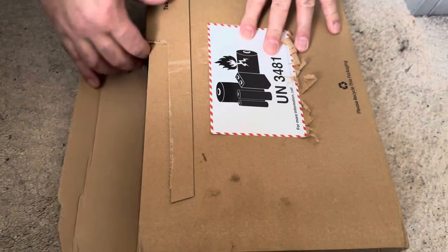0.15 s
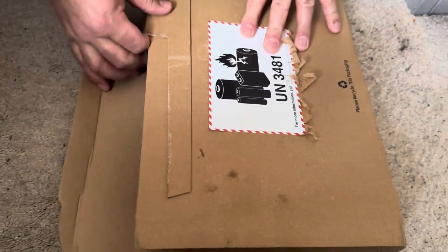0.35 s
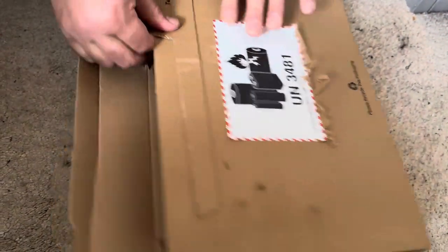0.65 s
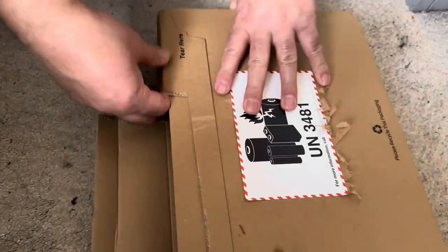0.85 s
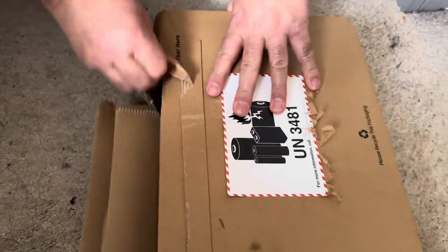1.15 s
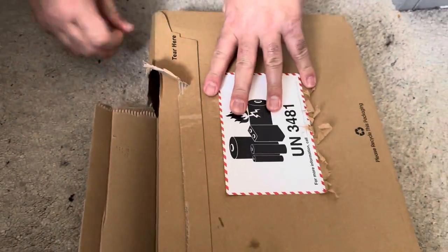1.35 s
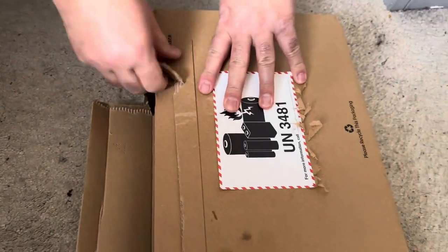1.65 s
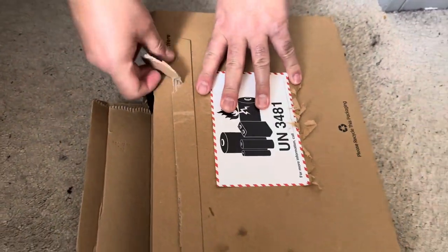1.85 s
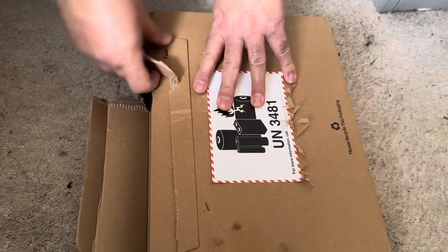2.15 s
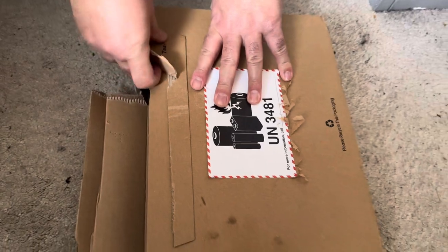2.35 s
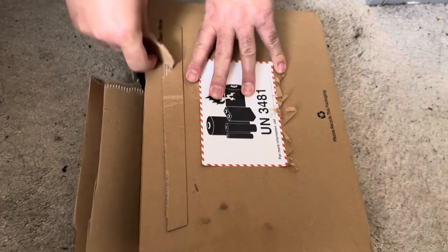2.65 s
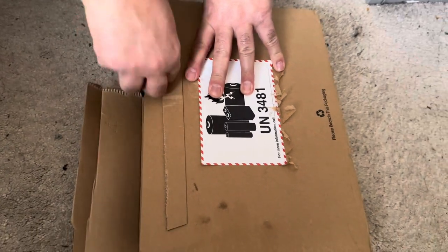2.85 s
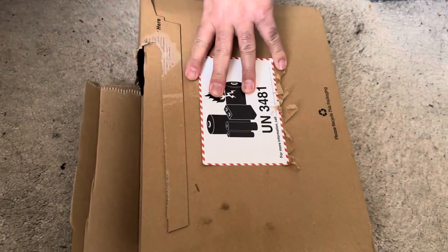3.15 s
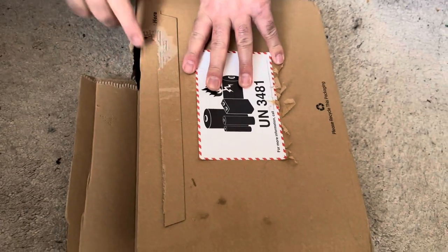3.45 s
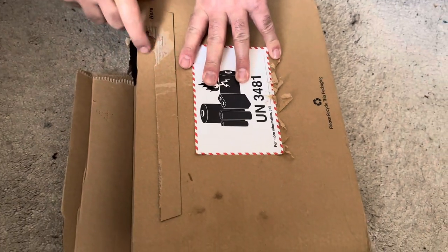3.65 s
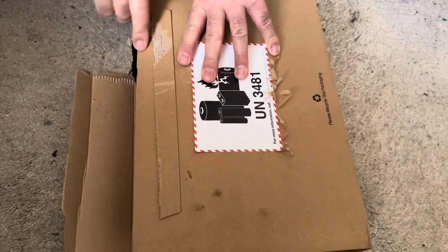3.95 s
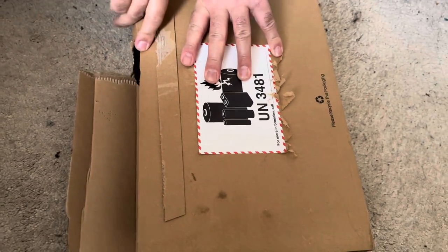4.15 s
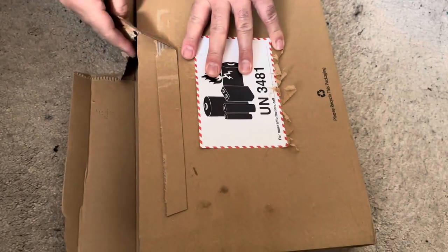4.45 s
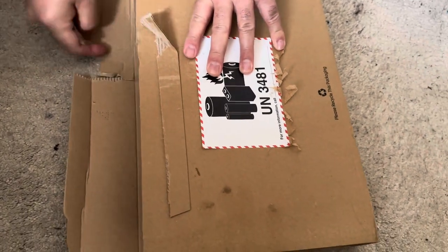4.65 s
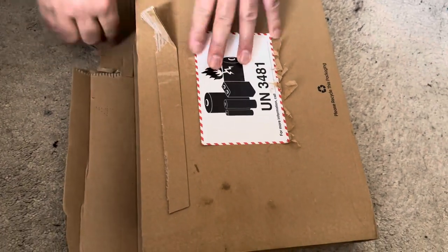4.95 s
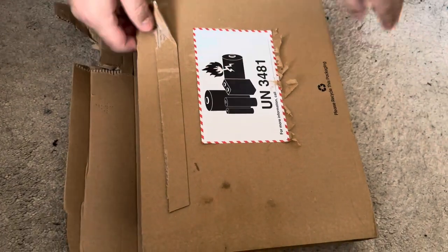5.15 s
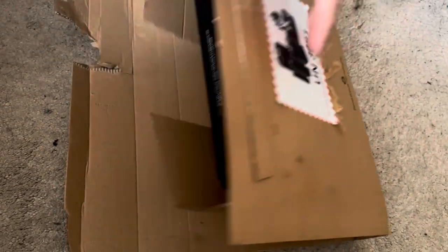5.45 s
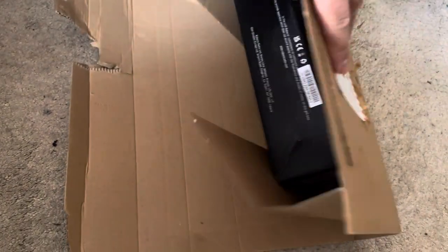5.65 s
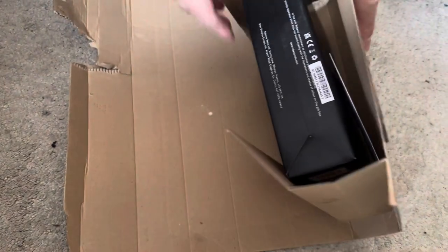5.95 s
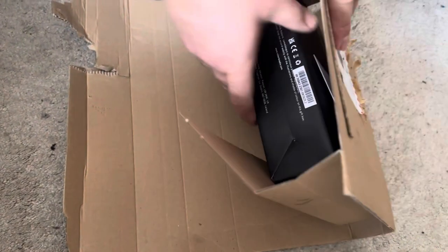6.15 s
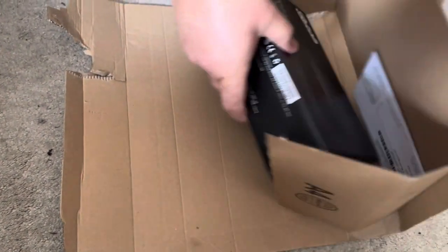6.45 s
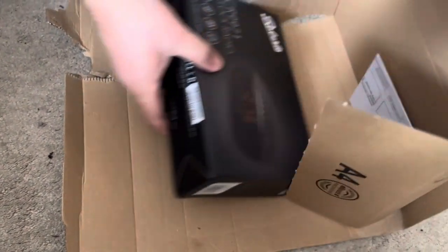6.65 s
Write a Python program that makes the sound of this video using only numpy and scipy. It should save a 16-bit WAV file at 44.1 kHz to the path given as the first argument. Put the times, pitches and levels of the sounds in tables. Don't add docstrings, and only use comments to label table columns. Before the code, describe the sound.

Hands tear open a corrugated cardboard box, very close in a small soft room. A rapid ripping burst comes first, then scattered snaps and another rip. Quiet rustling follows, a hard rip near three seconds, a lull, then faint prying with sharp cracks. The lid folds back with low knocks, and a stiff carton rasps over the cut edge in quick bumps to the end.

```python
import sys
import numpy as np
from scipy import signal
from scipy.fft import rfft, irfft, next_fast_len
from scipy.io import wavfile
from scipy.ndimage import uniform_filter1d, map_coordinates

SR = 44100
rng = np.random.default_rng(int(sys.argv[2]) if len(sys.argv) > 2 else 0)


def convert_level_to_amplitude(level_db):
    exponent = np.asarray(level_db, float) / 20
    return 10 ** exponent


def wav_out(sig):
    wavfile.write(sys.argv[1], SR, np.round(np.clip(np.atleast_2d(sig).T, -1, 1) * 32767).astype(np.int16))


N = 300321

# hardest at t/s, rise/s, fall/s, level/dB, brightness/dB (fibre up, board down)
LIFTING_STROKES = [(-0.006, 0.01, 0.036, -29.5, 1.5), (0.091, 0.059, 0.021, -28.5, -2.5),
                   (0.134, 0.13, 0.084, -36.5, 0), (0.252, 0.22, 0.075, -43, -1),
                   (0.38, 0.073, 0.077, -41.5, 1), (0.507, 0.006, 0.06, -51, -11.5),
                   (0.645, 0.063, 0.042, -39.5, 5.5), (0.761, 0.4, 0.23, -40.5, -1),
                   (0.765, 0.083, 0.021, -40.5, -0.5), (0.849, 0.15, 0.0068, -42, 5),
                   (1.094, 0.025, 0.092, -30, 2.5), (1.131, 0.21, 0.2, -38.5, 0.5)]
SETTLING_STROKES = [
    (1.4, 0.018, 0.11, -69.5, 2.6),
]
PULLING_STROKES = [(1.604, 0.01, 0.08, -38, 1), (1.747, 0.07, 0.19, -42.0, 1.5),
                   (1.95, 0.4, 0.18, -57, -5.5), (2.068, 0.038, 0.024, -52.5, -4),
                   (2.18, 0.037, 0.054, -45.5, -1), (2.273, 0.021, 0.067, -46, -2),
                   (2.378, 0.081, 0.034, -50.5, -2), (2.38, 0.013, 0.18, -54, 6.5),
                   (2.555, 0.022, 0.021, -47.5, -10), (2.661, 0.028, 0.011, -51.5, -2),
                   (2.803, 0.074, 0.027, -38, 2.5), (3.002, 0.011, 0.13, -40.5, -7),
                   (3.033, 0.073, 0.046, -20.5, -0.5), (3.064, 1, 0.053, -49, -1.5),
                   (3.284, 0.056, 0.016, -66, 16), (3.31, 0.0275, 0.051, -66.5, 1.5)]
PRYING_STROKES = [(3.493, 0.0067, 0.19, -52.5, 8.5), (3.499, 0.016, 0.087, -50, -6.5),
                  (3.651, 0.027, 0.073, -51, -1.5), (3.747, 0.055, 0.058, -49, 2),
                  (3.89, 0.07, 0.065, -50, -5.0), (3.957, 0.13, 0.136, -42.5, -3.5),
                  (4.02, 0.053, 0.036, -39.5, -5), (4.096, 0.018, 0.2, -39, 0.5),
                  (4.158, 0.0088, 0.07, -39, -2.5), (4.271, 0.038, 0.059, -31, 1.5),
                  (4.405, 0.075, 0.098, -41.5, -0.5), (4.573, 0.043, 0.064, -32, -2),
                  (4.798, 0.42, 0.043, -45, 2.0), (4.865, 0.019, 0.047, -33.5, -2),
                  (5.009, 0.28, 0.084, -46.5, 1)]
FOLDING_STROKES = [(5.144, 0.021, 0.037, -58, -4), (5.23, 0.053, 0.13, -52.5, -3),
                   (5.318, 0.09, 0.23, -45, 1.5), (5.51, 0.036, 0.059, -39, 6.5),
                   (5.582, .16, 0.11, -34.5, -0.5), (5.606, 0.033, 0.036, -33, 1),
                   (5.633, 0.23, 0.55, -48.5, -3), (5.793, 0.096, 0.039, -43.5, 2),
                   (5.822, 0.019, 0.13, -35.5, -2.5), (5.975, 0.042, 0.029, -35.5, -3),
                   (6.326, 0.048, 0.33, -35, -0.5), (6.397, 0.032, 0.056, -34, 10.5),
                   (6.562, 0.019, 0.05, -28.5, -2.5), (6.633, 0.48, 0.012, -48.5, 3.5)]
# t/s, peak level/dB
FLUTE_POPS = [(.023, -26), (.047, -14), (.061, -8.5), (.073, -6.5), (.082, -6), (.093, -4.5), (.103, -5.5),
              (.120, -14), (.126, -17), (.138, -3.5), (.146, -4), (.150, -6), (4.084, -20), (4.146, -19),
              (5.219, -34), (5.812, -17), (5.818, -15)]
# t/s, peak level/dB, tilt/(dB per
CARTON_BUMPS = [(6.631, -8, -3), (6.640, -9, -3), (6.650, -9, 4), (6.658, -10, 4), (6.665, -3, 0),
                (6.675, -7, 2), (6.682, -11, 2), (6.693, -5, 1), (6.701, -6, 3), (6.710, -9, 0),
                (6.720, -6, 0), (6.729, -4, 3), (6.739, -7, -1), (6.749, -6, 3), (6.762, -7, 1),
                (6.768, -12, 2), (6.774, -8, 2), (6.789, -8, 0), (6.794, -7, 2), (6.556, 0, 1)]
# level/dB of liner, board, fibre
SCRAPE_DB = (-19, -36, -40)
# t/s, peak level/dB
FIBRE_TICKS = [(0.0311, -14.5), (0.563, -22), (0.9722, -27.5), (1.0704, -11), (1.0864, -6.5), (1.1362, -5),
               (1.145, -11.5), (1.306, -32.5), (1.3237, -32), (1.3525, -35), (1.4554, -46), (1.4694, -45.5),
               (1.6164, -19.5), (2.3702, -16.5), (2.9595, -16.5), (2.9743, -16.5), (2.9844, -4),
               (3.8836, -27), (3.9132, -34.5), (3.926, -17), (4.2526, -11), (4.2634, -17), (4.2742, -6),
               (4.2876, -16), (4.2974, -12.5), (4.4288, -25), (4.5132, -29), (4.557, -12.5), (4.5752, -6),
               (4.8663, -10.5), (5.3134, -15.5), (5.5862, -16.5), (5.8222, -6), (5.9239, -19.5),
               (6.3071, -23)]
# t/s, peak level/dB, brightness/dB, ring f/Hz
PAPER_SNAPS = [(0.335, -19.5, 12.5, 950), (0.36, -20, 3.5, 990), (0.499, -5, 2.5, 1020),
               (0.721, -13.5, -4, 960), (0.849, -23, -16, 860), (1.0826, -5.5, 9, 2040),
               (1.103, -9, -0.5, 1030), (1.133, -17, 2, 1080), (1.144, -1, 0.5, 862),
               (1.216, -15.5, 8, 856), (1.339, -29.5, 5.5, 616), (1.377, -36.5, 8.5, 680),
               (1.444, -45, 13.5, 900), (1.598, -16.5, 7.5, 630), (1.619, -20, 0, 1140),
               (1.729, -22, 9, 670), (2.128, -39, -19, 680), (2.262, -26, -4.5, 610),
               (2.371, -21, -3.5, 3450), (2.515, -25, 2, 760), (2.544, -23.5, 1.5, 786),
               (2.658, -15.5, 0.5, 1635), (2.968, -18, 7, 1030), (2.999, -10.5, 7.5, 1050),
               (3.040, -2, -7, 597),
               (3.49, -24.5, -10.5, 970), (3.827, -38, -21.5, 904), (3.84, -27.5, -17.5, 910),
              (3.876, -23, 4, 1260), (3.926, -38, 8, 1180), (4.013, -16.5, -6, 930),
              (4.082, -21.5, -9, 1280), (4.147, -14.5, -5, 960), (4.227, -22.5, 12, 1260),
              (4.251, -4.5, 3.5, 1260), (4.274, -4.5, -0.5, 1106), (4.302, -11.5, -2.5, 890),
              (4.357, -26, -4.5, 770), (4.443, -23.5, 13, 2980), (4.461, -24.5, 12.5, 990),
              (4.515, -26, 9, 1270), (4.558, -16, 4.5, 1640), (4.577, -3, 5, 955), (4.849, -23, -13, 890),
              (4.868, -33.5, -2.5, 875), (5.305, -24.5, 4.5, 570), (5.33, -29.5, 18.5, 900),
              (5.587, -3, -7, 984), (5.824, 1.5, -8.5, 794), (5.939, -17.5, 7.5, 4050),
              (5.962, -0.5, -5, 896), (5.989, -16.5, -2.5, 730), (6.298, -20, -3, 820),
              (6.383, -13.5, -1, 2500), (6.547, -12.5, -12.5, 780)]
# t/s, peak level/dB, note f/Hz, t60/s
PANEL_KNOCKS = [(0.367, -20.5, 222.6, 0.04), (0.405, -12, 236, 0.02), (0.506, -26, 158, 0.13),
                (0.746, -17, 207, 0.048), (0.768, -12, 229, 0.051), (0.853, -19, 107, 0.18),
                (1.149, -21, 109, 0.09), (1.219, -16.5, 203.4, 0.084), (2.516, -23, 320, 0.043),
                (3.039, -6, 369, 0.034), (3.842, -49, 264, 0.11), (4.095, -31, 240, 0.17),
                (4.144, -34, 147, 0.14), (4.255, -34, 115, 0.092), (4.292, -27, 97, 0.17),
                (4.357, -28, 207, 0.077), (4.584, -31, 152, 0.096), (5.498, -18.5, 142, 0.041),
                (5.589, -14, 173, 0.089), (5.829, -11.5, 149, 0.052), (5.962, -27, 203, 0.14),
                (6.293, -24.5, 318, 0.084), (6.38, -26, 133, 0.18), (6.546, -19, 177.6, 0.15)]
# t/s, peak level/dB, note f/Hz, t60/s
POCKET_TAPS = [(0.370, -14.5, 261, 0.026), (0.501, -16.5, 560, 0.025), (0.751, -22.5, 170, 0.1),
               (0.768, -17, 477, 0.034), (0.770, -8.5, 283, 0.031), (0.852, -29, 505, 0.046),
               (0.859, -28, 93, 0.099), (1.1445, -5, 910, 0.019), (1.153, -23, 89, 0.16),
               (1.158, -22.5, 930, .04), (1.516, -27.5, 520, 0.036), (1.603, -25, 495, .04),
               (2.442, -36, 499, 0.041), (2.444, -41, 210, 0.041), (2.471, -37, 500, 0.046),
               (2.478, -38, 210, .06), (2.516, -33, 753, .04), (2.544, -27.5, 498, 0.066),
               (2.556, -30, 560, 0.049), (2.568, -25, 510, 0.03), (2.558, -28, 268, 0.07),
               (2.804, -25.5, 268, 0.074), (2.82, -35, 141, 0.1), (3.041, -7.5, 620, 0.011),
               (3.644, -44, 440, 0.091), (3.794, -35, 243, 0.055), (3.839, -31.5, 257, 0.088),
               (4.083, -22, 1310, 0.026), (4.146, -26, 785, 0.02), (4.264, -28, 327, 0.018),
               (4.287, -18.5, 1100, 0.017), (4.385, -32, 840, 0.065), (4.402, -29, 497, 0.044),
               (4.586, -26, 100, 0.13), (4.847, -29, 837, .05), (4.855, -23.5, 850, 0.033),
               (4.869, -22, 870, 0.039), (4.870, -17.5, 256, 0.059), (4.872, -34, 85, .15),
               (0.765, -27, 95, 0.15), (4.892, -35, 840, 0.06), (5.594, -23, 102, 0.14),
               (5.62, -20.5, 1190, 0.025), (5.832, -21.5, 87, 0.17), (5.964, -24.5, 180, 0.067),
               (5.99, -28, 250, 0.042), (4.576, -17.5, 420, 0.032), (4.594, -23.5, 254, 0.041),
               (6.558, -17.5, 187, 0.047), (6.575, -13, 1310, 0.022), (5.838, -13, 239, 0.037),
               (6.554, -26.5, 106, .2)]
# start t/s, end t/s,
# level/dB
HOLLOW_SCRAPES = [
    (1.377, 1.541, -54),
    (1.596, 1.676, -53),
    (1.748, 1.826, -54),
    (3.01, 3.058, -37),
]

# f/Hz, width/Hz, level/dB
CAVITY_MODES = [(560, 273, 0)]
FLAP_MODES = [(616, 150, -1), (864, 100, 0.71), (1380, 190, -1.5), (2105, 190, -0.62)]
CARTON_MODES = [(540, 200, -9), (1100, 300, 8), (1985, 240, 12), (2600, 450, 6), (3750, 320, 3)]

# f/Hz, level/dB (per Hz)
BOOM_COLOUR = [(18, -35.5), (30, -38.5), (48, 2), (86, 1), (124, 1), (260, -0.5), (340, -25), (570, -120)]
BOARD_COLOUR = [(120, -21.5), (200, -7.5), (263, -2), (377, -9), (488, 3), (545, -5), (914, 0.5),
                (1060, -3), (1300, -4), (1690, -19), (2860, -120)]
LINER_COLOUR = [(650, -11), (1100, -7), (1710, -3), (2010, -4.5), (2850, -7.5), (3210, -7), (4010, -9.5),
                (4750, -16), (5000, -14.5), (6500, -49.5), (11000, -120)]
FIBRE_COLOUR = [(2760, -20), (4700, -8.5), (5460, 1.5), (6450, -3), (7970, -1.5), (8750, -2.5), (10000, -2),
                (10900, -6.5), (14400, -3.5), (15500, -5), (16200, -13.5)]
HUSH_COLOUR = [(18, -23.5), (30, -2.5), (71, 7.5), (486, -22.5), (740, -19.5), (2500, -35), (9970, -48.5),
               (16000, -52.5)]
# f/Hz, side minus mid level/dB
STEREO_WIDTH = [(60, -25.5), (99, -29.5), (160, -16.5), (270, -13.5), (450, -11.5), (740, -8), (1220, -14),
                (2010, -14), (3330, -7.5), (5500, -3.5), (9080, -32), (15000, -2.5)]
# f/Hz, t60/s
ROOM_DECAY = [(150, 0.5), (1000, 0.079), (15000, 0.34)]

BOOM_DB, BOARD_DB, LINER_DB, FIBRE_DB = -11, 0.5, -2, -0.1
EDGE_DB, ROUNDNESS = 20, 2.5
OPEN_S, OPEN_DB, OPEN_BOOM_DB = 5.2, 5, 11
SNAP_T60_S, SNAP_BOARD_DB, SNAP_FIBRE_DB = 0.027, -11.5, -11
TAP_RISE_CYCLES, TAP_SAG_PER_S = 0.7, 1.5
HUSH_DB, TOP_HZ = -59, 15900


def unit(x):
    return x / np.sqrt(np.mean(x ** 2) + 1e-20)


def along(points, hz):
    f, v = np.transpose(points)
    return np.interp(np.log(hz + 1), np.log(f + 1), v)


def wobble(rate):
    knots = rng.standard_normal(int(N * rate / SR) + 4)
    return map_coordinates(knots, [np.arange(N) * rate / SR])


def shaped(x, response):
    m = next_fast_len(N)
    return irfft(rfft(x, m) * response(np.fft.rfftfreq(m, 1 / SR)), m)[..., :N]


def coloured(x, spectrum, keep=True):
    m = 2 ** 14
    gain = convert_level_to_amplitude(along(spectrum, np.fft.rfftfreq(m, 1 / SR)))
    cepstrum = irfft(np.log(gain + 1e-4))
    cepstrum[1:m // 2] *= 2
    cepstrum[m // 2 + 1:] = 0
    pulse = irfft(np.exp(rfft(cepstrum)))
    if keep:
        pulse = pulse / np.linalg.norm(pulse)
    return signal.fftconvolve(x, pulse)[:N]


def resonant(x, peaks):
    f = np.fft.rfftfreq(2 ** 13, 1 / SR)
    response = 0
    for k, (centre, width, db) in enumerate(peaks):
        damping = 1j * f * width
        response = response + (-1) ** k * convert_level_to_amplitude(db) * damping / (centre * centre - f * f + damping)
    pulse = irfft(response)
    return signal.fftconvolve(x, pulse / np.linalg.norm(pulse))[:N]


def bursts(times, dbs, t60s, attack, lag=0.):
    shape, t = np.zeros(N + SR), np.arange(SR // 12) / SR
    for s, db, t60 in zip(times, dbs, t60s):
        puff = convert_level_to_amplitude(db - 60 * t / max(t60, .003)) * (1 - np.exp(-t / attack))
        shape[round((s + lag) * SR):][:len(t)] += puff
    return shape[:N] * rng.standard_normal(N)


def rings(times, dbs, modes, rise):
    out, t = np.zeros(N + SR), np.arange(SR // 25) / SR
    for s, db, row in zip(times, dbs, modes):
        tone = np.zeros(len(t))
        for hz, width, level in row:
            strength = convert_level_to_amplitude(level + rng.normal(0, 3.0))
            cycles = hz * rng.normal(1, 0.029) * t + rng.random()
            tone += strength * np.sin(2 * np.pi * cycles) * np.exp(-np.pi * width * t)
        tone *= (1 - np.exp(-t / rise)) ** 2
        out[round(s * SR):][:len(t)] += convert_level_to_amplitude(db) * tone / np.abs(tone).max()
    return out[:N]


def patchy(db):
    z = signal.stft(rng.standard_normal(N), nperseg=256)[2]
    field = uniform_filter1d(rng.standard_normal(z.shape), 4, 0)
    field = uniform_filter1d(field, 12, 1)
    return signal.istft(z * convert_level_to_amplitude(db * unit(field)), nperseg=256)[1][:N]


def echo(x, stretch):
    hz, t, z = signal.stft(rng.standard_normal(SR // 2), SR, nperseg=128)
    t60 = stretch * along(ROOM_DECAY, hz)[:, None]
    tail = signal.istft(z * convert_level_to_amplitude(-60 * t / t60), SR, nperseg=128)[1]
    return signal.fftconvolve(x, tail / np.linalg.norm(tail))[:N]


def room_hush():
    return convert_level_to_amplitude(HUSH_DB) * coloured(rng.standard_normal(N), HUSH_COLOUR)


def strokes(t):
    power = np.full((3, len(t)), 1e-12)
    hands = LIFTING_STROKES + SETTLING_STROKES + PULLING_STROKES + PRYING_STROKES + FOLDING_STROKES
    for s, rise, fall, db, bright_db in hands:
        away = np.where(t < s, (s - t) / max(rise, .004), (t - s) / max(fall, .004))
        layer_db = db + np.array([[-bright_db], [0], [bright_db]])
        power += convert_level_to_amplitude(layer_db - EDGE_DB * away ** ROUNDNESS) ** 2
    return np.sqrt(power)


def rubbing():
    t = np.arange(N) / SR
    board, liner, fibre = [np.interp(t, t[::32], gain) for gain in strokes(t[::32])]
    scrape_s = CARTON_BUMPS[0][0]
    scraping = np.clip((t - scrape_s) / .012 + .5, 0, 1)
    opened = t > OPEN_S
    boom = convert_level_to_amplitude(BOOM_DB + OPEN_BOOM_DB * opened) * board
    boom = np.minimum(boom, convert_level_to_amplitude(-43))
    board = convert_level_to_amplitude(BOARD_DB) * board + convert_level_to_amplitude(SCRAPE_DB[1]) * scraping
    liner = convert_level_to_amplitude(LINER_DB + OPEN_DB * opened) * liner + convert_level_to_amplitude(SCRAPE_DB[0]) * scraping
    fibre = convert_level_to_amplitude(FIBRE_DB) * fibre + convert_level_to_amplitude(SCRAPE_DB[2]) * scraping

    grip = 2.2 * wobble(45)
    crackle = 3.2 * np.maximum(wobble(700) - 1.2, 0)

    def grains(db):
        return unit(convert_level_to_amplitude(db) * patchy(2.8))

    skin = liner * grains(grip + 1.74 * crackle + wobble(90))
    bumping = t > scrape_s
    touch = .34
    for at, db, _ in CARTON_BUMPS[:-1]:
        touch = touch + convert_level_to_amplitude(db + 5) * np.exp(-((t[bumping] - at - .003) / .002) ** 2)
    skin[bumping] *= touch
    sliding = .3 * ((t > 5.72) & (t < 6.02)) + .8 * bumping
    return (coloured(boom * grains(0.86 * wobble(27)), BOOM_COLOUR)
            + coloured(board * grains(grip + 1.1 * crackle + wobble(60)), BOARD_COLOUR)
            + coloured(np.sqrt(1 - sliding) * skin, LINER_COLOUR)
            + resonant(np.sqrt(sliding) * skin, CARTON_MODES[2:])
            + coloured(fibre * grains(grip + 2.0 * crackle + wobble(150)), FIBRE_COLOUR))


def flutes(events, body, rise, t60, grit_db, fibre_db, steep):
    s, db = np.transpose([row[:2] for row in events])
    life = np.full(len(s), t60)
    modes = []
    for row in events:
        tilt = sum(row[2:])
        modes.append([(hz, width, level + tilt * np.log2(hz / 1400)) for hz, width, level in body])
    return (rings(s, db - 1.5, modes, rise)
            + coloured(bursts(s, db + grit_db, life, 0.00033), LINER_COLOUR)
            + coloured(bursts(s, steep * db + fibre_db, life, 0.00061), FIBRE_COLOUR))


def ticks():
    s, db = np.transpose(FIBRE_TICKS)
    life = np.full(len(s), .011)
    return (coloured(bursts(s, db - 8, life, 0.00037), FIBRE_COLOUR)
            + coloured(bursts(s, db - 13, life, 0.00037), LINER_COLOUR))


def snaps():
    s, db, bright_db, hz = np.transpose(PAPER_SNAPS)
    board_db = db + SNAP_BOARD_DB - bright_db
    fibre_db = db + SNAP_FIBRE_DB + bright_db
    t60 = np.full(len(s), SNAP_T60_S)
    patch = [[(f, 3 / SNAP_T60_S, 0), (1.3 * f, 5 / SNAP_T60_S, -5)] for f in hz]
    return (coloured(bursts(s, fibre_db + 0.5, 0.63 * t60, 0.0007), FIBRE_COLOUR)
            + coloured(bursts(s, db - 10.0, 0.81 * t60, 0.00045), LINER_COLOUR)
            + rings(s, db - 10.0, patch, rise=0.0008)
            + coloured(bursts(s, board_db - 6.0, 1.41 * t60, 0.00033, lag=0.000077), BOARD_COLOUR))


def thumps():
    out, t = np.zeros(N + SR), np.arange(SR // 4) / SR
    for s, db, hz, t60 in PANEL_KNOCKS:
        pitch = hz * (0.616 + 0.00237 / (t + 0.00059) + .3 * np.exp(-t / 0.019))
        swing = np.sin(2 * np.pi * np.cumsum(pitch) / SR) * (1 - np.exp(-t / 0.0039))
        out[round(s * SR):][:len(t)] += convert_level_to_amplitude(db - 60 * t / t60) * swing
    return out[:N] + 0.39 * echo(out[:N], stretch=0.18)


def taps():
    out, t = np.zeros(N + SR), np.arange(SR // 5) / SR
    for s, db, hz, t60 in POCKET_TAPS:
        cycles = hz * (1 - np.exp(-TAP_SAG_PER_S * t)) / TAP_SAG_PER_S
        swing = np.sin(2 * np.pi * cycles) * (1 - np.exp(-t * hz / TAP_RISE_CYCLES))
        out[round(s * SR):][:len(t)] += convert_level_to_amplitude(db + 3.5 - 60 * t / t60) * swing
    return out[:N]


def hollow():
    t = np.arange(N) / SR
    gate = sum(convert_level_to_amplitude(db) * np.clip(np.minimum(t - a, b - t) / 0.0095, 0, 1) for a, b, db in HOLLOW_SCRAPES)
    drag = gate * convert_level_to_amplitude(1.5 * wobble(90)) * rng.standard_normal(N)
    pocket = resonant(resonant(drag, CAVITY_MODES), CAVITY_MODES)
    return pocket + .55 * resonant(drag, [(190, 200, 0)])


def port_spacing(hz):
    return 1j * convert_level_to_amplitude(along(STEREO_WIDTH, hz)) * (hz > 3200)


def scene():
    box = rubbing()
    box = box + flutes(FLUTE_POPS, FLAP_MODES, rise=0.0011, t60=0.013,
                       grit_db=-9.0, fibre_db=-2.0, steep=1.0)
    box = box + ticks() + snaps()
    box = box + convert_level_to_amplitude(3.4 * wobble(60)) * thumps()
    box = box + convert_level_to_amplitude(2.2 * wobble(80)) * taps()
    box = box + hollow()
    box = box + flutes(CARTON_BUMPS, CARTON_MODES, rise=0.003, t60=0.022,
                       grit_db=-15.0, fibre_db=-13.0, steep=1.9)
    room = convert_level_to_amplitude(-18.0) * echo(np.pad(box, (400, 0)), stretch=0.75)
    mid = box + room + room_hush()
    wandering = coloured(0.69 * wobble(250) * mid, STEREO_WIDTH, keep=False)
    side = wandering + 0.41 * shaped(mid, port_spacing)
    return np.array([mid + side, mid - side])


def low_pass(x):
    return signal.sosfilt(signal.butter(12, 16660, fs=SR, output="sos"), x)


def record(dry):
    x = shaped(dry, lambda hz: (hz < TOP_HZ) * (1j * hz / (24 + 1j * hz)) ** 2)
    x = x / (1 + np.abs(x / .92) ** 6) ** (1 / 6)
    return low_pass(x)


dry = scene()
out = record(dry)
wav_out(out)
```